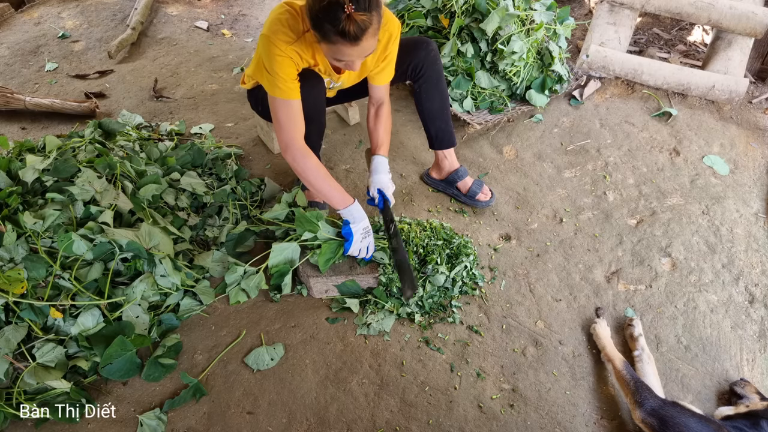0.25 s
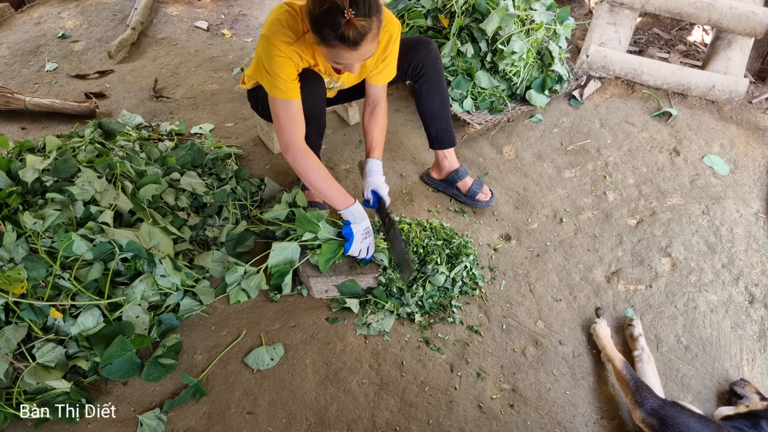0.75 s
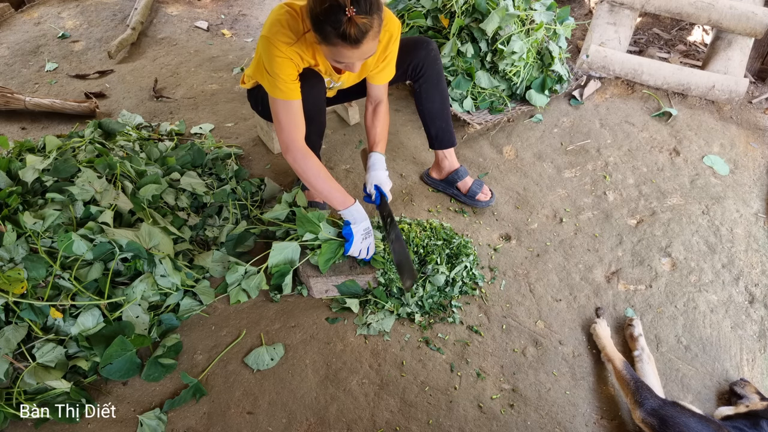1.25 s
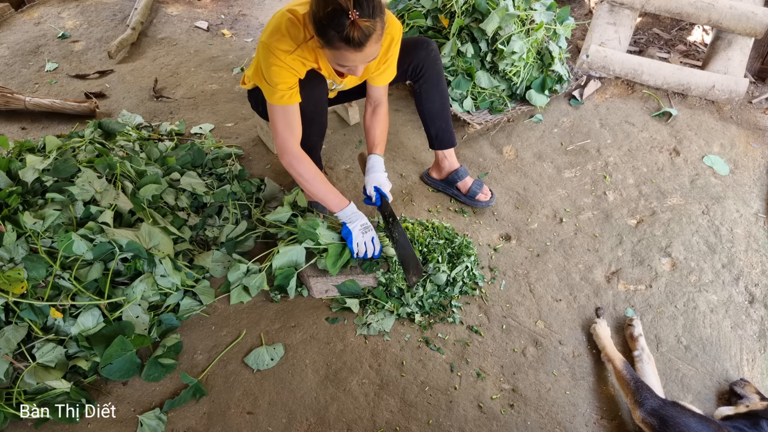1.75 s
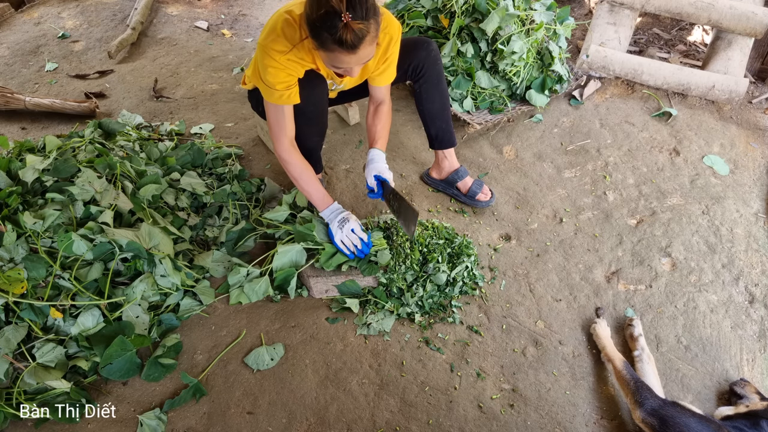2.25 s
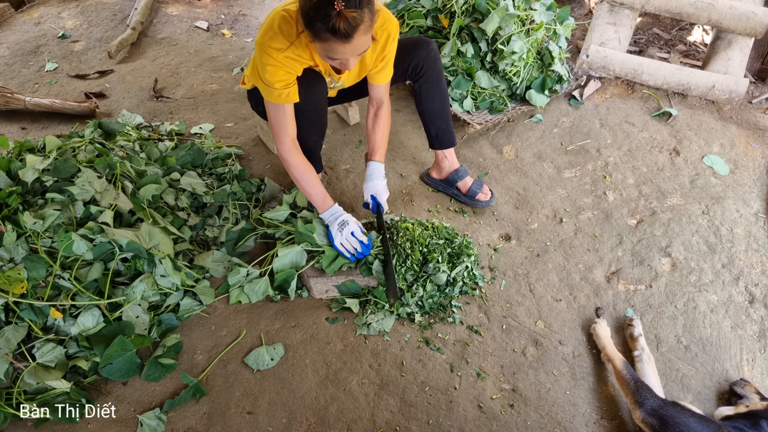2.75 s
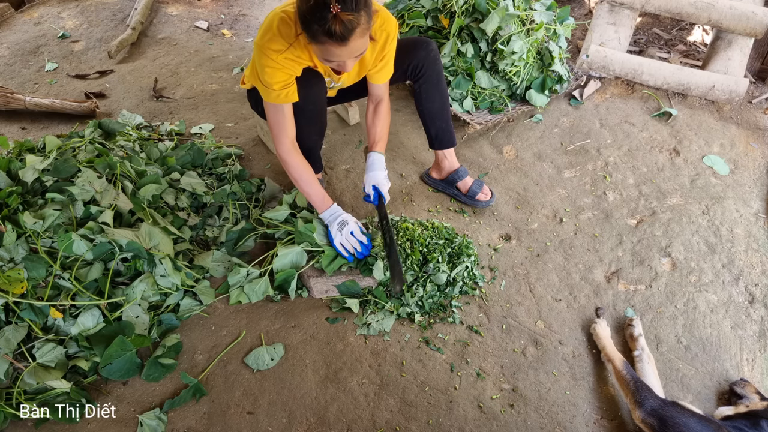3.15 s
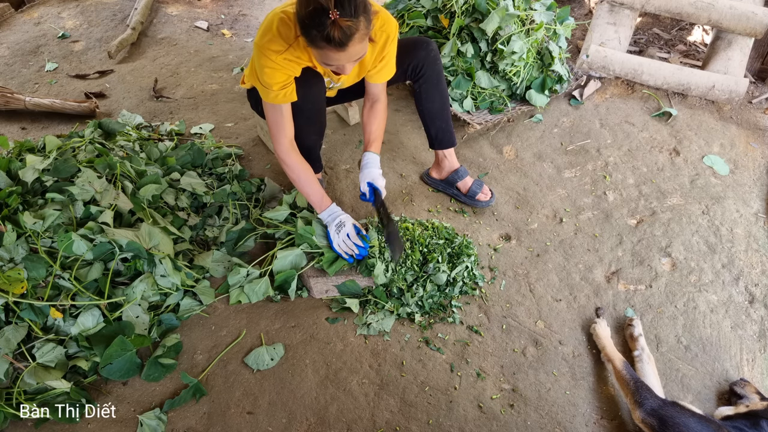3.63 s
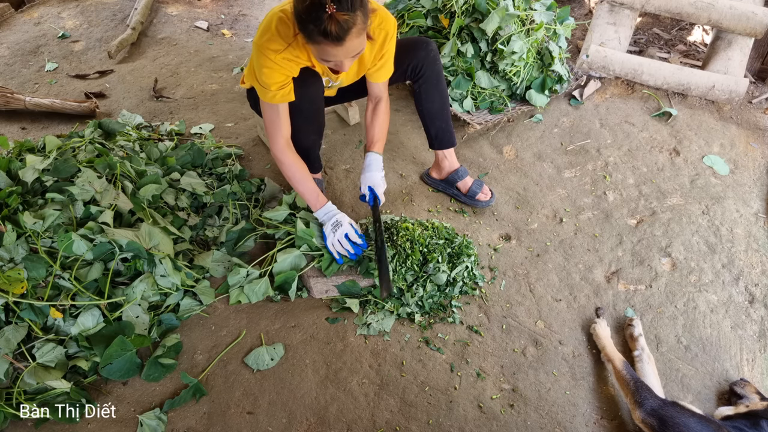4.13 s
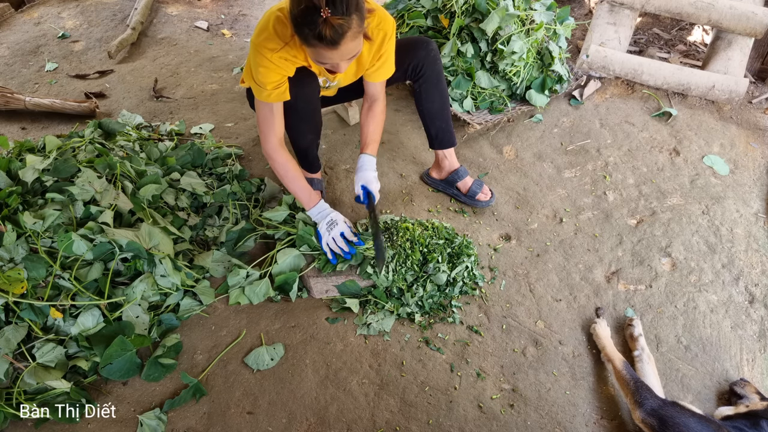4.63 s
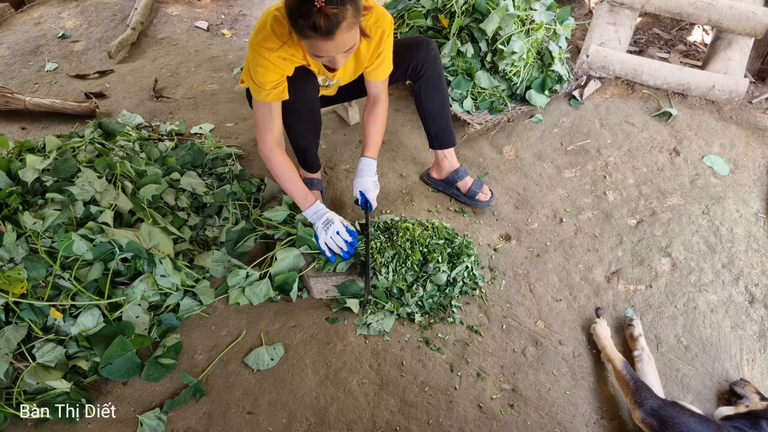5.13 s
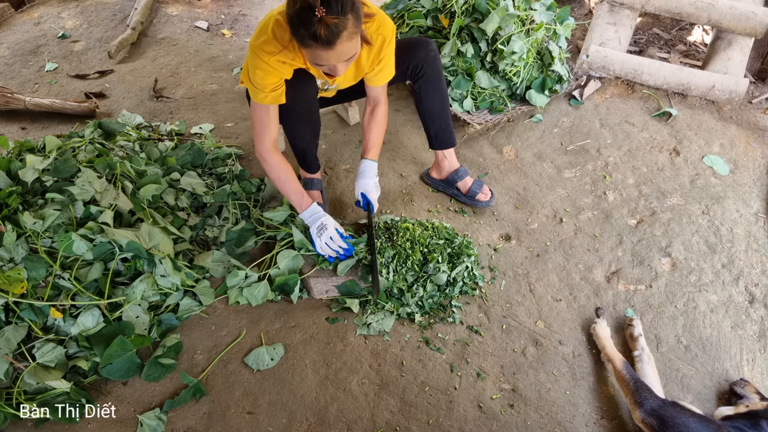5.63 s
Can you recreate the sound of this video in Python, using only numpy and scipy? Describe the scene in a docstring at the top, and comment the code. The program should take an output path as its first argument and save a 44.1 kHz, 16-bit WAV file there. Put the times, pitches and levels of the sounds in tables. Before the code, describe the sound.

Rapid machete chops through juicy vines rap a wooden board about three times a second, with short pauses, in a quiet outdoor yard.

```python
"""Chopping vines in a roofed yard

A machete chops leafy vines on a wooden board, about three strokes a second with pauses; two stop in the leaves.
Stems burst as filtered random snaps, then an impulse rings the board's modes and splintering noise follows.
Ground, roof and walls answer with delayed copies, a diffuse noise tail and low decaying sines.
A hand shifts the bundle; behind lie filtered-noise air, insect hiss and hum, and a far bird of gliding sines."""
import sys
import numpy as np
from scipy import signal
from scipy.fft import rfft, irfft, next_fast_len
from scipy.io import wavfile
from scipy.ndimage import map_coordinates

SR = 44100
rng = np.random.default_rng(int(sys.argv[2]) if len(sys.argv) > 2 else 0)


def store_pcm(level_fs):
    """Save levels as 16-bit WAV."""
    pcm = np.round(np.clip(level_fs, -1, 1) * 32767).astype(np.int16)
    wavfile.write(sys.argv[1], SR, np.atleast_2d(pcm).T)


N = 259308  # samples

# Outdoor air, slow level curve: time_s, level_db
AIR_LEVEL = [(0, -57.5), (.85, -61.5), (1.85, -55), (2.3, -59.5), (3.3, -57.5), (3.7, -56), (4.4, -54.5),
             (4.8, -59.5), (5.25, -56.5), (5.88, -59.5)]
# Outdoor air, spectral density: frequency_hz, density_db_per_hz
AIR_SPECTRUM = [(25, -31), (60, -8), (100, -5), (170, -13.5), (400, -8.5), (700, -7.5), (900, -8),
                (2000, -7), (3100, -1), (4500, -6.5), (6500, -8.5), (11000, -14), (15000, -17.5)]
# Outdoor air, left-right correlation: frequency_hz, correlation
AIR_CORRELATION = [(100, 0.99), (350, .7), (900, -.3), (2000, -0.27), (5000, 0.087), (12000, -0.14)]
# Insect chorus, left row then right row; each resonance acts twice: centre_hz, resonance_width_hz, level_db
INSECT_BANDS = [(8100, 2300, -1), (7920, 1500, 0.5)]
# Far bird notes: start_s, start_pitch_hz, level_db
BIRD_NOTES = [(1.045, 3555, -53.5), (1.255, 2420, -53), (1.355, 2076, -56.5), (1.585, 2070, -51.5),
              (1.89, 2067, -57), (2.22, 1594, -57.5), (2.38, 1756, -58.5), (2.72, 1080, -53.5),
              (3.53, 3565, -57), (3.84, 2190, -56), (4.03, 2050, -56), (4.19, 2040, -55.5)]
# A hand shifts the bundle: centre_s, rustle_db, bump_db, bump_pitch_hz, gaussian_length_s
BUNDLE_SHIFTS = [(0.941, -59.5, -52.5, 321, .02), (1.66, -48, -43.5, 344, .016),
                 (1.891, -60, -58, 240, 0.013), (1.935, -53, -72, 110, 0.023), (2.061, -59, -86, 203, 0.12),
                 (2.38, -70.5, -66, 230, 0.016), (4.618, -68.5, -60.5, 199, 0.018),
                 (5.821, -56.5, -42.5, 147.5, 0.0094)]
# Sliding leaves, spectral density: frequency_hz, density_db_per_hz
RUSTLE_SPECTRUM = [(200, -9.5), (800, -3.5), (2500, -0.5), (4500, -5.5), (8000, -7.5), (15000, -6.5)]
# Strokes: blade_stop_s, knock_db, board_pitch_hz, crunch_db, cutting_time_s
STROKES = [(0.2168, -2, 662, -24, .012), (0.5459, -2, 674, -23.5, .01), (.8726, -2, 654, -25, .01),
           (1.201, -2.5, 666, -25.5, 0.011), (1.529, -2, 665, -30.5, 0.015), (2.4631, -0.5, 660, -27, .012),
           (2.7874, -6, 664, -25.5, .012), (3.1092, -3, 656, -31, .015), (3.4347, -23.5, 633, -26, 0.012),
           (3.761, -3, 662, -24, .01), (4.0929, -3, 666, -23.5, 0.011), (4.4173, -1.5, 671, -25, 0.011),
           (4.751, -40.5, 656, -26, .011), (5.0796, -2.5, 688, -30.5, .016),
           (5.6861, -0.5, 669, -32.5, 0.005)]
# Board modes at the reference pitch, before the spot struck alters them: frequency_hz, width_hz, level_db
BOARD_MODES = [(499, 91, -8), (638.2, 84, 2), (786, 124, -7), (923, 40, -16), (1124, 120, -19),
               (1300, 90, -15.5), (1630, 62, -21), (1987, 110, -26), (2540, 70, -26), (3410, 82, -29)]
# Edge biting wood, spectral density: frequency_hz, density_db_per_hz
CRACK_SPECTRUM = [(60, -30), (180, -8), (330, -9), (450, -6.5), (900, 3), (1300, -4), (1700, -2),
                  (2500, -3.5), (2900, -9.5), (3600, -11), (4600, -15.5), (9000, -32), (15000, -38)]
# Stems bursting, spectral density: frequency_hz, density_db_per_hz
CRUNCH_SPECTRUM = [(100, -17.5), (250, -6), (550, -3), (1400, -1), (2500, -2), (4500, -3.5), (8000, -4.5),
                   (11000, -9.5), (15500, -8.5)]
# Early echoes from ground, roof and walls: left_delay_s, right_delay_s, low_frequency_gain
ECHOES = [(.00401, .00412, .33), (.00843, .00771, .11), (.01184, .0119, .17), (.01337, .01333, .13),
          (.01638, .01647, .22), (.02883, .02919, .07), (.03197, .03222, .03)]
# Diffuse tail, reverberation time: frequency_hz, t60_s
TAIL_DECAY = [(100, 0.62), (600, 0.11), (2000, 0.13), (6000, 0.14), (15000, 0.043)]
# Diffuse tail, colour: frequency_hz, level_db
TAIL_SPECTRUM = [(100, -9), (350, -11), (650, -19.5), (1000, -6.5), (2500, -6.5), (8000, -4.5),
                 (15000, 1.5)]
# Low air modes between ground, roof and walls, before random scatter:
# frequency_hz, level_db, t60_s, build_up_s, arrival_s
AIR_MODES = [(43, -23, 0.25, 0.015, .005), (84.87, -8, 0.074, 0.0016, .009), (86.6, -3, 0.18, 0.031, 0.014),
             (104, 0, 0.16, .03, .0284), (143.5, -3.5, .08, 0.0034, .0042), (195, 0.5, .065, .002, .0029),
             (292.5, -5, 0.041, 0.00045, 0.00069), (346, -3, 0.043, 0.0028, 0.00064)]
# Treble difference of the two microphone ports: frequency_hz, left_minus_right_db
PORT_DIFFERENCE = [(3000, 0), (5500, -2), (7200, 4), (8300, -5.5), (10000, -10.5), (12500, -3.5),
                   (15000, -3)]

HUM_HZ, HUM_RESONANCE_WIDTH_HZ, HUM_DB = 587.2, 42, -62.5
HUM_WAVER_DB, HUM_WAVERS_PER_S = 5, 10
INSECT_DB, INSECT_FLUTTER_DB = -51.5, 0.5
NOTE_S, NOTE_FALL = 0.07, 0.06  # the fall is a share of the start pitch
BIRD_ECHO_DB, BIRD_ECHO_T60_S = -2.5, 0.7
BOARD_PITCH_HZ = 662  # reference pitch of the board modes
CRACK_DB, BOOM_DB = -13.5, -23  # relative to the knock
USUAL_CRUNCH_DB, CUSHION = -26.5, 0.4  # a thicker bundle softens the crack: dB lost per dB of crunch
THUD_DB = -42  # boom that reaches the ground through the leaves alone
BOOM_SCATTER_DB, BOOM_SCATTER_SHARE = 1, 0.018  # random spread of each mode's level and pitch
TOP_HZ = 15550  # upper band limit


def amp(db):
    """Level law: a gain is ten to the power of dB / 20."""
    return 10 ** (np.asarray(db) / 20)


def unit(x):
    """Normalisation of power: scale to rms 1."""
    return x / np.sqrt(np.mean(x ** 2) + 1e-20)


def along(points, hz):
    """Logarithmic frequency scale: interpolate (frequency, value) points."""
    f, v = np.transpose(points)
    return np.interp(np.log(hz + 1), np.log(f + 1), v)


def wobble(rate):
    """Slow random modulation: a smooth curve through normal knots, rate of them a second."""
    knots = rng.standard_normal(int(N * rate / SR) + 4)
    return map_coordinates(knots, [np.arange(N) * rate / SR])


def filtered(x, response):
    """Linear filtering: multiply the spectrum by a response of frequency."""
    n = x.shape[-1]
    m = next_fast_len(n + SR // 10, True)
    return irfft(rfft(x, m) * response(np.fft.rfftfreq(m, 1 / SR)), m)[..., :n]


def resonance(hz, centre, width):
    """Simple resonator: the causal response of one damped mode."""
    return 1j * hz * width / (centre ** 2 - hz ** 2 + 1j * hz * width)


def coloured(x, spectrum, size=2048):
    """Minimum-phase filtering: a folded cepstrum gives a causal response with the wanted levels."""
    levels = amp(along(spectrum, np.fft.rfftfreq(size, 1 / SR)))
    cepstrum = irfft(np.log(levels))
    cepstrum[1:size // 2] *= 2
    cepstrum[size // 2 + 1:] = 0
    impulse_response = irfft(np.exp(rfft(cepstrum)))
    return signal.fftconvolve(x, impulse_response)[:len(x)]


def grains(n, rate, noise_share):
    """Random impulse process: about rate snaps a second over a bed of noise, rms 1."""
    snaps = rng.standard_normal(n) * (rng.random(n) < rate / SR)
    return unit(unit(snaps) + noise_share * rng.standard_normal(n))


def spread(draw, split_hz):
    """Spatial coherence of a wide source: lows reach both ports alike, highs unrelated; rms 1."""
    common, left, right = draw(), draw(), draw()
    shared = lambda f: 1 / np.sqrt(1 + (f / split_hz) ** 2)
    separate = lambda f: shared(f) * f / split_hz
    return unit(filtered(common, shared) + filtered(np.array([left, right]), separate))


def add(track, sound, s):
    """Superposition: mix a sound into the track at time s."""
    i = max(round(s * SR), 0)
    track[..., i:i + sound.shape[-1]] += sound[..., :N - i]


def yard(x):
    """Reflection and scattering: direct sound, early echoes and a diffuse tail drawn afresh each call."""
    n = x.shape[-1]
    hz, t, cells = signal.stft(rng.standard_normal((2, n)), SR, nperseg=256)
    decay = amp(-60 * t / along(TAIL_DECAY, hz)[:, None])
    onset = 1 - np.exp(-t / 0.0027)
    tail = signal.istft(cells * decay * onset, SR, nperseg=256)[1]
    tail = filtered(tail / np.linalg.norm(tail[0]), lambda f: amp(along(TAIL_SPECTRUM, f)))
    diffuse = signal.fftconvolve(np.atleast_2d(x), tail, axes=1)[:, :n]

    mirror_hz = 3000  # rough surfaces mirror only the lows

    def direct_and_early(f):
        """Interference: each echo is a phase shift proportional to frequency."""
        early = sum(gain * np.exp(-2j * np.pi * f * np.array([[left], [right]]))
                    for left, right, gain in ECHOES)
        return 1 + early / (1 + (f / mirror_hz) ** 2)

    return diffuse + filtered(x, direct_and_early)


def hum():
    """Narrow-band noise: a faint hum whose level swells and fades at random."""
    response = lambda f: resonance(f, HUM_HZ, HUM_RESONANCE_WIDTH_HZ) ** 2
    band = unit(filtered(rng.standard_normal((2, N)), response))
    return band * amp(HUM_DB + HUM_WAVER_DB * wobble(HUM_WAVERS_PER_S))


def air():
    """Partly correlated noise: mid and side shares set the likeness of the ports as the level drifts."""
    level_db = np.interp(np.arange(N) / SR, *np.transpose(AIR_LEVEL))
    # correlation is the cosine of twice this mixing angle
    angle = lambda f: np.arccos(np.clip(along(AIR_CORRELATION, f), -1, 1)) / 2
    shares = lambda f: amp(along(AIR_SPECTRUM, f)) * [np.cos(angle(f)), np.sin(angle(f))]
    mid, side = filtered(rng.standard_normal((2, N)), shares)
    stereo = unit(np.array([mid + side, mid - side]))
    return stereo * amp(level_db + 0.84 * wobble(11.0)) * amp([[0.8], [-0.8]])  # left slightly louder


def insects():
    """Incoherent chorus: independent band noise at each port, a high hiss with a slight common flutter."""
    sides = []
    for hz, width, db in INSECT_BANDS:
        band = filtered(rng.standard_normal(N), lambda f: resonance(f, hz, width) ** 2)
        sides.append(amp(db) * unit(band))
    return np.array(sides) * amp(INSECT_DB + INSECT_FLUTTER_DB * wobble(14))


def bird():
    """Frequency glide: short falling whistles with a random phase walk, smeared by echoes from the trees."""
    out = np.zeros((2, N))
    t = np.arange(SR // 2) / SR
    progress = np.minimum(t / NOTE_S, 1)
    for s, hz, db in BIRD_NOTES:
        phase = 2 * np.pi * np.cumsum(hz * (1 - NOTE_FALL * progress)) / SR
        blur = np.cumsum(0.1 * rng.standard_normal(len(t)))  # radians
        note = amp(db) * np.sin(np.pi * progress) * np.sin(phase + blur)
        trees = rng.standard_normal((2, len(t))) * amp(-60 * t / BIRD_ECHO_T60_S)
        trees /= np.linalg.norm(trees[0])
        echo = signal.fftconvolve(note[None], trees, axes=1)[:, :len(t)]
        add(out, note + amp(BIRD_ECHO_DB) * echo, s)
    return out


def handling():
    """Friction and soft impact: a hand slides the bundle, so leaves rustle and stems bump."""
    out = np.zeros((2, N))
    t = np.arange(-SR // 5, SR // 3) / SR
    for s, rustle_db, bump_db, hz, length in BUNDLE_SHIFTS:
        leaves = lambda: coloured(grains(len(t), rate=500, noise_share=0.3), RUSTLE_SPECTRUM)
        rustle = spread(leaves, split_hz=3000)
        bump = unit(filtered(rng.standard_normal(len(t)), lambda f: resonance(f, hz, hz / 2) ** 2))
        mixture = amp(rustle_db) * rustle + amp(bump_db) * bump
        add(out, yard(mixture * np.exp(-(t / length) ** 2)), s + t[0])
    return out


def crunch(t, cutting):
    """Brittle fracture: stems burst in a dense crackle as the blade sinks in, dying away when it stops."""
    steepness = (t + 0.78 * cutting) / (0.15 * cutting)
    entry = 1 / (1 + np.exp(np.minimum(-steepness, 50)))
    leaves = amp(-23 + 13 * np.minimum(t + cutting, 0) / cutting)  # loose leaves are brushed first
    release = np.exp(-np.maximum(t, 0) / 0.0023)
    snaps = lambda: coloured(grains(len(t), rate=7000, noise_share=0.8), CRUNCH_SPECTRUM)
    return spread(snaps, split_hz=6700) * (entry + leaves) * release


def knock(t, pitch):
    """Modal excitation: an impulse rings the board; pitch and mode strengths vary with the spot struck."""
    push = np.diff(t >= 0, prepend=False).astype(float)  # one sample at t = 0
    # the weaker the mode, the more its level varies
    spot_db = 0.15 * np.transpose(BOARD_MODES)[2] * rng.standard_normal(len(BOARD_MODES))

    def wood(f):
        """Modal sum: neighbouring modes respond with opposite sign."""
        return sum((-1) ** k * amp(db + spot_db[k]) * resonance(f, hz * pitch / BOARD_PITCH_HZ, width)
                   for k, (hz, width, db) in enumerate(BOARD_MODES))

    ring = filtered(push, wood)
    return -ring / np.abs(ring).max()


def crack(t):
    """Splintering: the edge bites the wood in a burst of noise lasting a few milliseconds."""
    burst = spread(lambda: coloured(rng.standard_normal(len(t)), CRACK_SPECTRUM), split_hz=1500)
    age = np.maximum(t, 0)
    return burst * (1 - np.exp(-age / 0.00042)) * np.exp(-age / 0.0046)


def boom(t):
    """Room modes: low air resonances arrive, build up and decay, each stirred a little differently."""
    out = np.zeros(len(t))
    for hz, db, t60, rise, arrival in AIR_MODES:
        louder, higher = rng.standard_normal(2)
        age = np.maximum(t - arrival, 0)
        decay = amp(db + BOOM_SCATTER_DB * louder - 60 * age / t60)
        build_up = 1 - np.exp(-(age / rise) ** 2)
        out += decay * build_up * np.sin(2 * np.pi * hz * (1 + BOOM_SCATTER_SHARE * higher) * age)
    return out


def chopping():
    """Fracture then impact: each crunch is followed by a knock whose force sets crack and boom."""
    out = np.zeros((2, N))
    t = np.arange(-SR // 20, SR // 3) / SR
    for s, knock_db, pitch, crunch_db, cutting in STROKES:
        bite_db = CRACK_DB - CUSHION * (crunch_db - USUAL_CRUNCH_DB)
        wood = amp(knock_db) * (knock(t, pitch) + amp(bite_db) * crack(t))
        boom_gain = amp(knock_db + BOOM_DB) + amp(THUD_DB)
        blow = yard(wood) + boom_gain * boom(t)
        stems = yard(amp(crunch_db) * crunch(t, cutting))
        # the board lies a little to the left
        stroke = blow * amp([[1.1], [-1.1]]) + stems * amp([[0.3], [-0.3]])
        add(out, stroke, s + t[0])
    return out


def scene():
    """Superposition of all that sounds in the yard."""
    return hum() + air() + insects() + bird() + handling() + chopping()


def record(dry):
    """Transduction: ports differ in treble colour, high peaks are rounded off and the band is limited."""
    ported = filtered(dry, lambda hz: amp(along(PORT_DIFFERENCE, hz) * np.array([[0.5], [-0.5]])))
    rounded = ported / (1 + np.abs(ported) ** 8) ** (1 / 8)
    return filtered(rounded, lambda hz: 1 / (1 + (hz / TOP_HZ) ** 120))


dry = scene()
out = record(dry)
store_pcm(out)
```